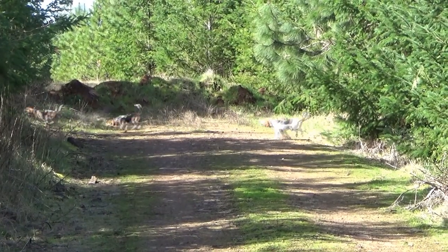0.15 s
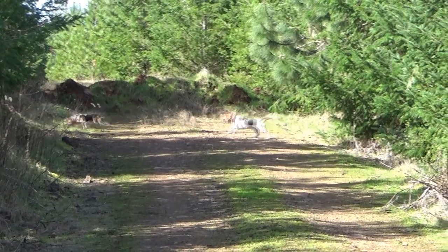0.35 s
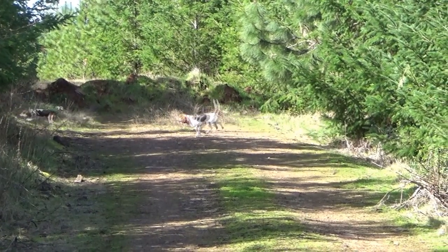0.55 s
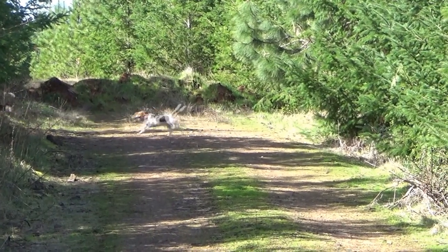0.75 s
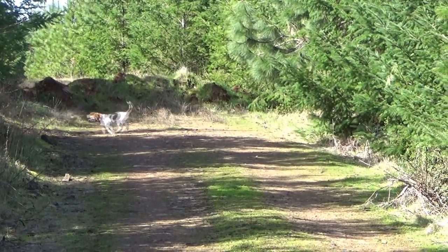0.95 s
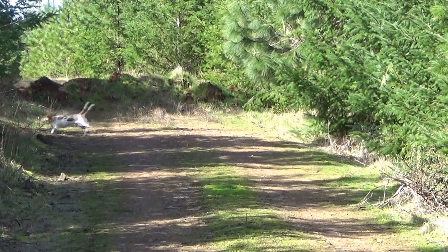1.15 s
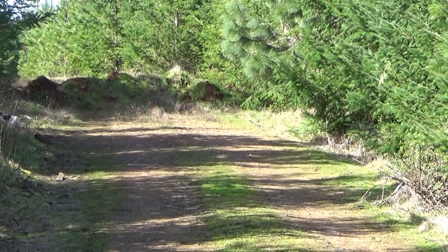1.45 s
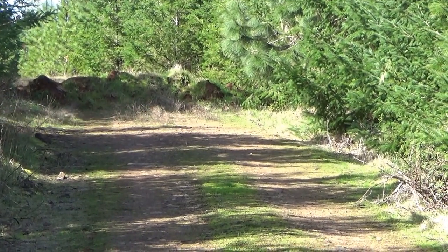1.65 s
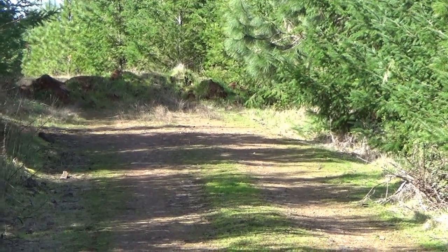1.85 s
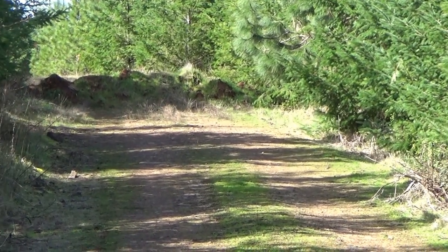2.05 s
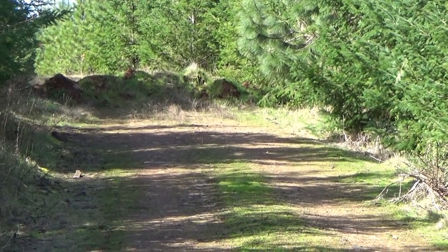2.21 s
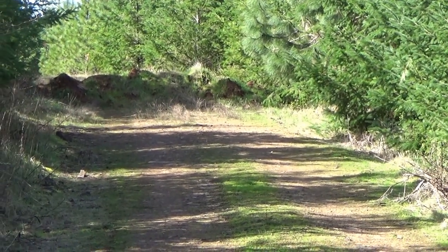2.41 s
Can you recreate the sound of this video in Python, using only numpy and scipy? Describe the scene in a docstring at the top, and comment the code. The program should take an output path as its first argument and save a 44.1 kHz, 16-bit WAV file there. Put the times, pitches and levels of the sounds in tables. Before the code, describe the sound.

Hounds bay in a forest, with distant calls from the very start. From about 0.2 to 0.45 seconds one close dog gives the loudest call, a hoarse bark that clears into a short howl and falls away. Farther, quieter dogs continue with overlapping short howls, rough barks and high yelps until about 2.5 seconds, a little stronger after 1.8. The calls echo briefly among trees over faint open-air hiss.

```python
"""Hounds giving tongue in a forest

A pack runs along a trail. One near dog bays: a hoarse bark that closes into a clear howl. Farther
dogs answer with howls, rough barks and high yelps. Vibrating vocal folds supply the harmonics, throat
resonances shape them, and irregular vibration makes them hoarse. Trunks scatter the calls into an
echo, and brush rustles faintly over the low rumble and hiss of the open air."""
import sys
import numpy as np
from scipy import signal
from scipy.fft import rfft, irfft, next_fast_len
from scipy.io import wavfile
from scipy.ndimage import uniform_filter1d, minimum_filter1d, map_coordinates

SR = 44100
rng = np.random.default_rng(int(sys.argv[2]) if len(sys.argv) > 2 else 0)


def to_wav(sig):
    """Store sig (one row per channel, or 1-D mono) as 16-bit WAV at the path in sys.argv[1].

    Samples outside -1..1 are clipped; the rate is SR.
    """
    pcm = np.clip(np.atleast_2d(sig), -1, 1) * 32767
    pcm = np.round(pcm).astype(np.int16)
    wavfile.write(sys.argv[1], SR, pcm.T)  # frames by channels


N = 114660
T = np.arange(N) / SR

# throat resonances of the farther dogs: f/Hz, relative level/dB
PACK_THROAT = [(250, -37), (430, -4), (600, 21), (900, 9), (1250, 0), (1900, -8), (2500, -16),
               (3000, -23.5), (3600, -36.5), (5500, -33), (8000, -35), (13000, -47.5)]


def near_bay():
    """Source and filter: a hoarse bark closes on a strong fundamental and ends in a falling groan."""
    # course of the bay: t/s, pitch f/Hz, fundamental level/dB, overtone level/dB,
    # mouth tilt/(dB per octave), roughness
    course = [(.219, 538, -46, -37, 4, 0.5), (.227, 523, -37, -21, -13, 0),
              (.236, 558.7, -32, -22.5, 0, 0.97), (0.244, 598, -45, -15, -3, 1.14),
              (0.267, 544.2, -40, -7.5, -3.5, 0.67), (0.277, 566, -25.5, -1, -3.5, 0.82),
              (0.289, 578, -17, -19.5, -3.5, 0.3), (0.3, 626.3, -16, -24.5, -2, 0.1),
              (0.323, 640, 2, -25.5, 6.5, 0.1), (0.331, 620.4, -10, -24.5, -4, 0.77),
              (0.365, 595.3, -14.5, -20.5, -14.5, 1), (0.399, 574.5, -14.5, -32.5, -1, 0.2),
              (0.409, 500.3, -28.5, -23.5, -9.5, 0.46), (0.422, 400, -51, -27.5, -2.5, 1.1),
              (0.458, 174, -53.5, -44.5, -9.5, 0.9)]
    # main resonances of the throat: f/Hz, relative level/dB
    throat = [(250, -53), (450, -31), (680, 1), (850, 6), (1400, -4), (1800, -5.5), (2300, -14),
              (2900, -23), (3500, -54)]
    # its thin upper resonances: f/Hz, relative level/dB
    upper_throat = [(3000, -22), (4900, -13.5), (6300, -1.5), (7000, 1), (7500, -4), (9300, -4.5),
                    (11000, -25.5)]
    times, *columns = np.transpose(course)
    t = np.arange(times[0], times[-1], 1 / SR)
    pitch, tone_db, over_db, tilt_db, rough = [np.interp(t, times, column) for column in columns]
    phase = fold_phase(t, pitch, jitter=0.011, rate=300)
    tone = amp(tone_db) * np.sqrt(2) * np.sin(phase)
    rasp = amp(over_db) * overtones(t, phase, pitch, throat, tilt_db, rough, chaos=0.37, rate=190)
    hiss = overtones(t, phase, pitch, upper_throat, 0, rough, chaos=1, rate=260)
    hiss_gain = amp(tone_db - 47) + amp(over_db - 37.5)
    return place(t, tone + rasp + hiss_gain * hiss)


def howls():
    """Random modulation spreads the overtones of held notes and yips into a husk over a thin tone."""
    # howls: start t/s, length t/s, first f/Hz, last f/Hz,
    # fundamental level/dB, overtone level/dB, roughness of the fundamental
    calls = [(-.04, 0.077, 637.7, 573.5, -29.5, -32.5, 0.68), (0.038, 0.11, 698.2, 643, -38, -41, 0.8),
             (0.626, 0.11, 649, 639.2, -39.5, -41, 1.2), (0.741, 0.012, 715, 687, -28.5, -29.5, 0.05),
             (1.073, 0.12, 635, 545, -30.5, -39, 0.06), (1.28, 0.12, 596.9, 660.3, -34, -39, 1),
             (1.455, 0.017, 737, 770, -32, -39, 0.5), (1.675, 0.13, 593.6, 521.2, -37.5, -37, 0),
             (1.925, 0.12, 650, 585.3, -32, -33.5, 0), (2.042, 0.11, 604, 579.3, -40, -50, 0.03),
             (2.399, 0.073, 633, 653.6, -31, -34, 0.37), (2.502, 0.21, 652.7, 615, -34, -35.5, 0.5),
             (2.53, 0.12, 578, 524, -32, -35.5, 0.5)]
    out = np.zeros(N)
    for start, length, first_hz, last_hz, tone_db, over_db, rough in calls:
        t, pitch, envelope = call(start, length, first_hz, last_hz, attack_s=0.0047)
        phase = fold_phase(t, pitch, jitter=0.012, rate=190.6)
        rasp = overtones(t, phase, pitch, PACK_THROAT, tilt_db=2, rough=0.89, chaos=1, rate=380, first=3)
        tone = np.sqrt(2) * partial(t, phase, smear=0.24 * rough, rate=280)
        out += place(t, envelope * (amp(tone_db) * tone + amp(over_db) * rasp))
    return out


def barks():
    """Irregular vibration of the folds, sounding through an open mouth, gives nearly pure rasp."""
    # barks: start t/s, length t/s, first f/Hz, last f/Hz, level/dB, tilt/(dB per octave), roughness
    calls = [(0.502, .1, 635.6, 489.2, -34.5, 7.5, 1), (0.95, 0.015, 484, 502, -39.5, 23, 0.3),
             (1.186, 0.032, 425, 421, -31, 7, 0.06), (1.21, 0.074, 497, 443, -32, -1, 0.51),
             (1.39, 0.085, 628.2, 585, -39.5, 9.5, 0.43), (1.829, 0.093, 482.2, 526.4, -32.5, 7, 0.83),
             (1.882, .13, 715.3, 588.7, -30, 8, 1.1), (2.252, .055, 513.8, 468.3, -29.5, 12.5, 0.65),
             (2.308, 0.11, 510.3, 473.2, -34.5, 8.5, 0.76), (2.46, 0.077, 635, 589.8, -31.5, 12, 0.57)]
    out = np.zeros(N)
    for start, length, first_hz, last_hz, db, tilt_db, rough in calls:
        t, pitch, envelope = call(start, length, first_hz, last_hz, attack_s=0.013)
        phase = fold_phase(t, pitch, jitter=0.017, rate=242.4)
        rasp = overtones(t, phase, pitch, PACK_THROAT, tilt_db, rough, chaos=0.98, rate=155.7)
        out += place(t, envelope * amp(db) * rasp)
    return out


def yelps():
    """Six harmonics about an octave above the howls; random modulation frays the highest first."""
    # yelps: start t/s, length t/s, first f/Hz, last f/Hz, fundamental level/dB,
    # octave level/dB, level/dB of harmonics 3-6 ahead of the throat, roughness
    calls = [(-.02, 0.081, 1271, 1361, -41.5, -46.5, -72, 0.13),
             (0.156, 0.032, 1110, 1188, -39.5, -47.5, -76.5, 0.54),
             (0.69, 0.041, 1435, 1284, -37, -46.5, -49.5, .9),
             (.758, 0.041, 1232, 1240, -40, -46.5, -53.5, 0.16),
             (0.817, 0.029, 1187, 1224, -39, -44.5, -63, 0.1),
             (1.043, 0.038, 1290, 1346, -38, -40.5, -79, 0.02),
             (1.168, 0.038, 907, 960, -36, -33, -75, 0.72), (1.352, 0.08, 924, 1229, -44, -48, -64.5, 0.5),
             (1.412, 0.13, 1244, 1096, -38.5, -50, -62.5, 0.96),
             (1.638, 0.041, 1245, 1216, -35, -37, -65, 0.01),
             (1.847, 0.0303, 1655, 1440, -38, -79, -75, 0.1),
             (1.865, 0.034, 1262, 1154, -31.5, -38, -57, 0.25),
             (1.935, 0.11, 1296, 1174, -31, -60, -50, 0.77), (2.314, 0.056, 1002, 913, -33, -63, -72, 0.6),
             (2.348, 0.079, 1536, 1368, -36, -53, -53.5, 0.64),
             (2.384, 0.095, 1300, 1198, -33, -47.5, -58, 0.6)]
    # throat resonance acting on harmonics 3-6: f/Hz, level/dB
    throat = [(3700, -7), (4250, -1.5), (5500, -8.5), (7500, -18)]
    out = np.zeros(N)
    for start, length, first_hz, last_hz, tone_db, octave_db, high_db, rough in calls:
        t, pitch, envelope = call(start, length, first_hz, last_hz, attack_s=0.0061, arch=0.019)
        phase = fold_phase(t, pitch, jitter=0.0094, rate=249)
        levels = [tone_db, octave_db] + [high_db + along(throat, k * pitch) for k in range(3, 7)]
        voice = sum(amp(db) * partial(t, k * phase, smear=rough * k / 2, rate=170 * k)
                    for k, db in enumerate(levels, 1))
        out += place(t, envelope * np.sqrt(2) * voice)
    return out


def call(start, length, first_hz, last_hz, attack_s, arch=0.02104):
    """Glide and envelope of one call: the pitch bulges by the share `arch` as the level sinks 1 dB."""
    release_s = 0.022
    t = np.arange(int((length + release_s / 2) * SR)) / SR
    progress = np.clip(t / length, 0, 1)
    pitch = (first_hz + (last_hz - first_hz) * progress) * (1 + arch * np.sin(np.pi * progress))
    gate = np.clip(t / attack_s, 0, 1) * np.clip((t[-1] - t) / release_s, 0, 1)
    return t + start, pitch, np.sin(gate * np.pi / 2) * amp(1 - progress)


def fold_phase(t, pitch, jitter, rate):
    """The phase of the vocal folds is the integral of their trembling frequency."""
    return 2 * np.pi * np.cumsum(pitch * (1 + jitter * wobble(t, rate))) / SR


def overtones(t, phase, pitch, throat, tilt_db, rough, chaos, rate, first=2):
    """Throat-filtered harmonics at unit power; period doubling adds lines halfway between them."""
    rough = np.clip(rough, 0, 1)
    wave, power = 0, 1e-20
    for k in np.arange(first, 44) / 2:
        hz = k * pitch
        mouth_octaves = np.log2(np.clip(hz, 600, 2800) / 1000)
        treble_octaves = np.log2(np.clip(hz, 3200, 5000) / 3200)  # here the tilt reverses
        gain = amp(along(throat, hz) + tilt_db * (mouth_octaves - 1.6 * treble_octaves))
        if k % 1 or k == 1:  # half-order lines and the fundamental grow with roughness
            gain *= rough
        wave += gain * partial(t, k * phase, chaos * rough * k, rate)
        power += gain ** 2 / 2
    return wave / np.sqrt(power)


def partial(t, phase, smear, rate):
    """Random modulation moves the share `smear` of a sinusoid's power into sidebands."""
    smear = np.clip(smear, 0, 1)
    flutter = np.sqrt(1 - smear) + np.sqrt(smear / 2) * (wobble(t, rate) + 1j * wobble(t, rate))
    return np.imag(flutter * np.exp(1j * phase))


def forest(x, wet_db, build_s):
    """Scattering by trunks adds a stereo echo that builds up, then decays exponentially by band."""
    # reverberation time: f/Hz, t/s to fall 60 dB
    decay = [(200, 0.15), (700, 0.75), (1300, 0.88), (2500, 0.56), (5000, 0.64), (10000, 0.37)]
    # width of the echo: f/Hz, side over mid level/dB
    width = [(600, -14), (2400, -7), (4500, -5), (9000, -17.5)]
    hz, t, spectra = signal.stft(rng.standard_normal((2, SR)), SR, nperseg=256)
    envelope = amp(-60 * t / along(decay, hz)[:, None]) * (1 - np.exp(-t / build_s))
    tail = signal.istft(spectra * envelope, SR, nperseg=256)[1]
    tail /= np.linalg.norm(tail[0])
    mid, side = amp(wet_db) * signal.fftconvolve(x[None], tail, axes=1)[:, :N]
    side = filtered(side, lambda hz: amp(along(width, hz)))
    return np.array([x + mid + side, x + mid - side]) / np.sqrt(1 + amp(wet_db) ** 2)


def brush():
    """Friction of dogs against twigs: short swells of bright noise with a crackling amplitude."""
    # swishes: centre t/s, half length t/s, level/dB
    rustles = [(0.13, 0.044, -60.5), (1.498, 0.013, -57.5)]
    # spectrum of the twigs: f/Hz, relative level/dB
    twigs = [(3000, -10), (8000, 9), (11000, 4), (14000, -19)]
    swell = sum(amp(db) * np.exp(-((T - centre) / half) ** 2) for centre, half, db in rustles)
    return swell * unit(noise(twigs) * amp(3.4 * wobble(T, 330)))


def open_air():
    """Ambient noise: a faint rumble with hiss, partly coherent between left and right."""
    # spectrum of the air: f/Hz, relative level/dB
    spectrum = [(22, -25), (40, -9), (92, 0.5), (125, -5.5), (350, -11.5), (1000, 0.5), (3000, -19),
                (7000, -27), (15500, -30.5)]
    # its width: f/Hz, side over mid level/dB
    width = [(70, -24), (170, -7.5), (6000, -7.5), (9000, -23)]
    mid = noise(spectrum)
    side = filtered(noise(spectrum), lambda hz: amp(along(width, hz)))
    return amp(-49.5) * np.array([mid + side, mid - side])


def amp(db):
    """Level in decibels to amplitude ratio."""
    return 10 ** (np.asarray(db) / 20)


def unit(x):
    """Normalisation to rms 1."""
    return x / np.sqrt(np.mean(x ** 2) + 1e-20)


def along(points, hz):
    """Interpolation of (f/Hz, value) points on a logarithmic frequency axis."""
    f, values = np.transpose(points)
    return np.interp(np.log(hz + 1), np.log(f + 1), values)


def wobble(t, rate):
    """Smooth noise: a spline through `rate` random knots a second."""
    return map_coordinates(rng.standard_normal(4096), [(t - t[0]) * rate + 2], mode="mirror")


def filtered(x, response):
    """Linear filtering: the spectrum of x times a frequency response."""
    pad, size = 2048, x.shape[-1]
    x = np.pad(x, [(0, 0)] * (x.ndim - 1) + [(pad, pad)], mode="reflect")
    m = next_fast_len(x.shape[-1])
    return irfft(rfft(x, m) * response(np.fft.rfftfreq(m, 1 / SR)), m)[..., pad:pad + size]


def noise(spectrum):
    """White noise coloured by a spectrum, at rms 1."""
    return unit(filtered(rng.standard_normal(N), lambda hz: amp(along(spectrum, hz))))


def place(t, wave):
    """Time shift of a call onto the scene's axis."""
    return np.interp(T, np.round(t[0] * SR) / SR + np.arange(len(t)) / SR, wave, left=0, right=0)


def scene():
    """The ratio of echo to direct sound gives distance: one dog close, the pack deep in the trees."""
    # balance of the calls, brighter on the left: f/Hz, left over right level/dB
    lean = [(1200, 0.5), (2800, 2.5), (8000, 1)]
    dogs = forest(near_bay(), wet_db=-20, build_s=0.0043)
    dogs += forest(howls(), wet_db=-7, build_s=0.013)
    dogs += forest(barks(), wet_db=-7, build_s=0.02)
    dogs += forest(yelps(), wet_db=-5.5, build_s=0.0023)
    dogs = filtered(dogs, lambda hz: amp(np.outer([0.5, -0.5], along(lean, hz))))
    return dogs + brush() + open_air()


def record(dry):
    """Fast peak limiting holds down the loudest bay; a steep low-pass bounds the band."""
    ceiling_db, top_hz = -5, 15700
    needed_gain = np.minimum(1, amp(ceiling_db) / (np.abs(dry).max(axis=0) + 1e-9))
    gain = uniform_filter1d(minimum_filter1d(needed_gain, size=220), size=220)  # 5 ms windows
    low_pass = signal.ellip(12, 0.1, 90, top_hz, fs=SR, output="sos")
    return signal.sosfilt(low_pass, dry * gain)


dry = scene()
out = record(dry)
to_wav(out)
```